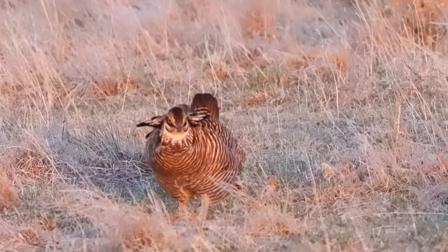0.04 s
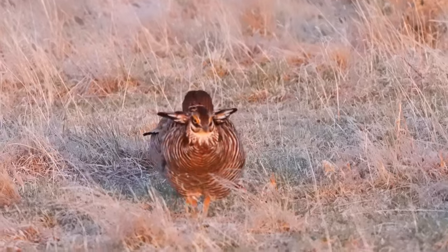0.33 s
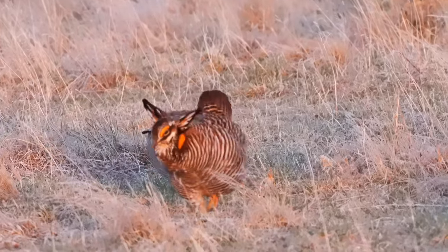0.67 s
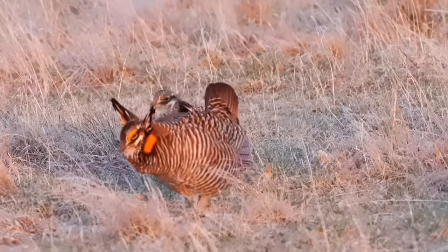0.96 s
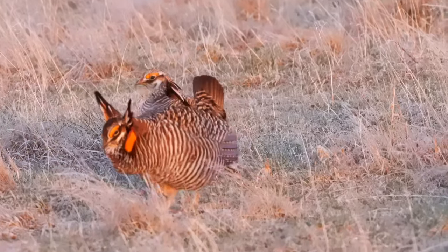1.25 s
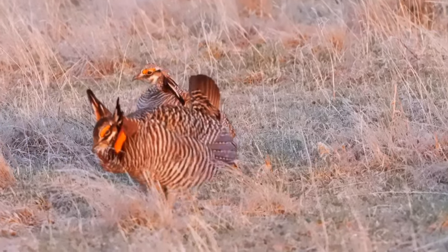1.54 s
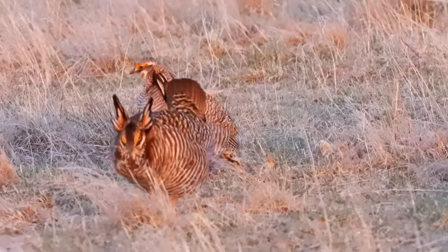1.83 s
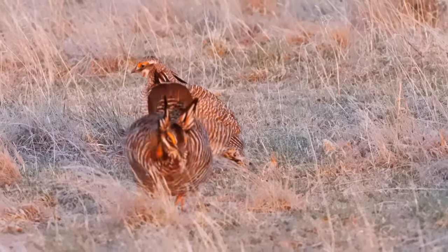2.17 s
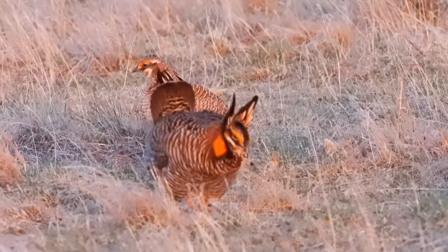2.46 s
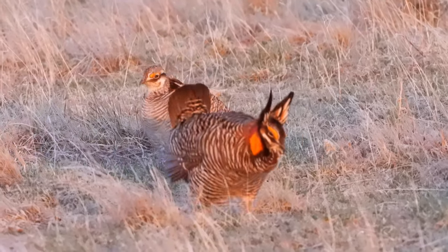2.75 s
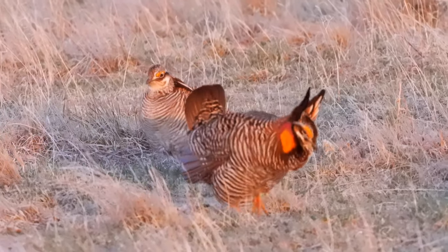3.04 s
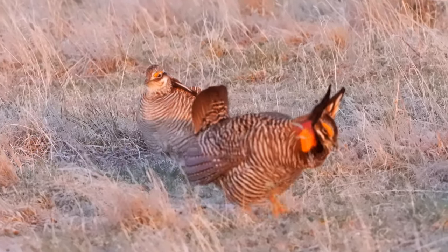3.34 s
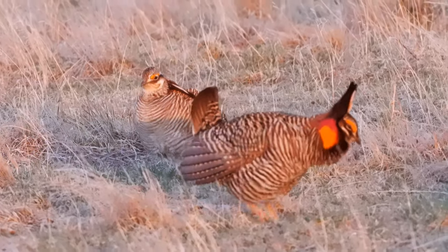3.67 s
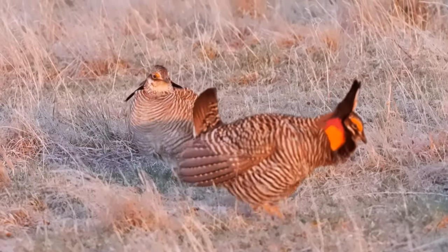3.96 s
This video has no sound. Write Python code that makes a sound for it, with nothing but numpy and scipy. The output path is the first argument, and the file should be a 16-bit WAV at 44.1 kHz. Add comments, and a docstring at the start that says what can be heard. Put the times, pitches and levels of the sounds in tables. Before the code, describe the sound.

Grouse call in open dry grassland: brief yelps, then two runs of rough cackles, and nasal whines at the end. Songbirds twitter and whistle throughout, mostly to the right, over light wind and a distant flock.

```python
"""Open grassland, where prairie grouse display with rough cackles, yelps, nasal whines and a faint boom.
A grouse call is a harmonic source, the syrinx, filtered by the throat; the far boom comes from air sacs.
Songbirds, mostly to the right, whistle, twitter and slur in gliding tones. Dry stems snap, and wind
hisses in the grass over the blur of the distant flock. The ground and the grass scatter the nearer
calls into a short tail."""
import sys
import numpy as np
from scipy import signal
from scipy.fft import rfft, irfft, next_fast_len
from scipy.io import wavfile
from scipy.ndimage import uniform_filter1d, map_coordinates

SR = 44100
rng = np.random.default_rng(int(sys.argv[2]) if len(sys.argv) > 2 else 0)


def bounce(signal):
    """Save signal as a 16-bit WAV file at the path given by the first command-line argument."""
    frames = np.transpose(np.atleast_2d(signal))
    limited = np.clip(frames, -1, 1)
    pcm = np.round(limited * 32767).astype(np.int16)
    wavfile.write(sys.argv[1], SR, pcm)


N = 176400

# Spectra of still air, flock and grass hiss. Each row: frequency in Hz, relative density in dB.
AIR_SPECTRUM = [(25, -25), (100, -13), (180, -5), (600, -1), (2000, 10), (4500, 11), (8000, 6.5),
                (15500, 0.5)]
FLOCK_SPECTRUM = [(25, -51), (100, -41.5), (230, -30), (370, -11), (700, -3.5), (1200, 1.5), (2000, 2),
                  (3000, -10.5), (6000, -50), (12000, -58)]
HISS_SPECTRUM = [(300, -24), (2000, -2), (4500, 0), (7000, -3.5), (9500, 1), (15500, -2.5)]
# Likeness of distant sound in the two channels. Each row: frequency in Hz, coherence from 0 to 1.
FAR_COHERENCE = [(60, 0.92), (250, 0.95), (600, 0.55), (1200, 0.48), (2500, 0)]
# Envelopes of the flock, the gusts and the booming. Each row: time in seconds, level in dB.
FLOCK_LEVEL = [(0, -54), (.5, -58), (.9, -44), (1.25, -48), (1.5, -41.5), (1.9, -44), (2.15, -46),
               (2.65, -49), (3.05, -42.5), (3.45, -49), (3.7, -52.5), (4, -46.5)]
GUST_LEVEL = [(.55, -59), (.88, -45), (.98, -49.5), (1.25, -44), (1.5, -43), (1.78, -48.5), (1.9, -45.5),
              (2.1, -47), (2.3, -54), (2.8, -57.5), (3.5, -58.5), (3.67, -49), (4, -47)]
BOOM_LEVEL = [(1.6, -85), (2.15, -73), (2.3, -63), (2.48, -76), (2.65, -69), (3.25, -64), (3.7, -80)]
# Balance of the hiss. Each row: frequency in Hz, pan in dB (every pan is left over right).
HISS_PAN = [(4000, 1), (8000, -2), (12000, 5)]
# Reverberation of the field. Each row: frequency in Hz, seconds to decay by 60 dB.
FIELD_DECAY = [(300, 0.95), (1500, 0.27), (3000, 0.39), (8000, 0.046)]
# Grouse yelps and whines. Each row: start and length in seconds, first, middle and last pitch in Hz,
# relative level in dB, roughness from 0 to 1, pan in dB.
YELPS = [(.04, 0.06, 556, 605, 660, -52.5, 0.5, 1), (.123, 0.052, 771, 804, 745, -46, 0.9, 6),
         (.568, 0.029, 720, 870, 1063, -45, 0.54, 5), (.588, 0.048, 1026, 1186, 1322, -27.5, 0.56, 4.5),
         (.825, 0.05, 1444, 1383, 1316, -30.5, 0.48, 6)]
WHINES = [(3.758, 0.115, 640, 436.5, 361, -40, 0.9, -2), (3.908, 0.1, 510, 506, 480, -35, 0.25, -4)]
# Grouse cackle notes. Each row: start and length in seconds, first and last pitch in Hz,
# relative level in dB, roughness from 0 to 1.
CACKLES = [(0.905, 0.03, 780, 850, -39, .3), (0.934, 0.03, 770, 590, -34.5, 0.4),
           (1.02, 0.027, 805, 799, -39, 0.15), (1.045, 0.019, 950, 985, -30.5, .08),
           (1.063, 0.03, 680, 550, -37.5, 0.35), (1.338, 0.02, 985, 925, -39.5, 0.25),
           (1.356, 0.024, 780, 600, -35, 0.2), (1.414, 0.032, 930, 925, -36, 0.22),
           (1.443, 0.022, 740, 610, -34.5, 0.35), (1.492, 0.014, 910, 900, -37, 0.2),
           (1.514, 0.019, 880, 990, -35, 0.25), (1.537, .03, 890, 845, -33, 0.25),
           (1.569, 0.034, 960, 895, -31.5, 0.2), (1.603, 0.02, 900, 735, -37, 0.2),
           (1.629, 0.034, 780, 610, -42, 0.3), (3.045, 0.028, 797, 894, -35, 0.8),
           (3.128, 0.026, 796, 780, -41, 0.3), (3.168, 0.036, 780, 932, -37, 0.6),
           (3.291, 0.019, 694, 600, -39.5, 0.7), (3.355, 0.015, 725, 600, -40, .8),
           (3.409, 0.0174, 723, 576, -41.5, .7)]
# Throat responses of the three grouse calls. Each row: frequency in Hz, relative gain in dB.
YELP_THROAT = [(600, 13), (1300, -10), (1700, -25), (6000, -46)]
CACKLE_THROAT = [(400, -56.5), (900, -15), (1350, 4), (1900, 2), (2300, -3.5), (2900, -33), (4000, -26.5),
                 (7000, -30)]
WHINE_THROAT = [(350, -16), (520, -14), (1000, 5.5), (1550, 0), (2050, -11.5), (3000, -31), (4000, -14.5),
                (5000, -48)]
# Songbird whistles. Each row: start and length in seconds, first and last pitch in Hz,
# level in dB, swell over the note in dB, pan in dB.
WHISTLES = [(0.046, 0.066, 2060, 1907, -39, 25, -4.5), (0.152, 0.051, 1988, 1887, -31, 10.5, -5.5),
            (0.389, 0.068, 2308, 2234, -35, 5, -5), (0.447, 0.075, 2090, 1730, -48, -19, -3),
            (0.469, 0.059, 2240, 2134, -45.5, -11, 1), (0.503, 0.16, 1770, 1616, -39.5, -6.5, -6),
            (0.728, 0.0976, 3130, 3020, -34, 4, -4), (0.841, 0.046, 1995, 1945, -26, 12, -7.5),
            (0.951, 0.027, 2480, 2470, -35, 11, -7), (1.141, 0.07, 2454, 2363, -26.5, -2.5, -7),
            (1.212, 0.026, 1740, 1686, -36.5, 2, -9), (1.555, 0.058, 4680, 4860, -40, -3, 2),
            (1.718, 0.052, 2930, 2975, -29, -1, -1.5), (1.969, 0.085, 3500, 3500, -31.5, 8, -2.5),
            (2.121, 0.069, 2637, 2638, -31, 2, 1), (2.224, 0.085, 2575, 2655, -28, 10.5, -0.5),
            (2.38, .1, 3636, 3575, -33.5, -6, -3), (2.595, 0.065, 4226, 4165, -29.5, 8.5, -4),
            (2.821, 0.024, 2133, 2100, -23.5, 2, -3), (2.905, 0.13, 1514, 1457, -27, -5.5, -9),
            (3.889, 0.059, 2600, 2504, -24, -3, -4)]
# Twitter syllables. Each row: time in seconds, level in dB.
SYLLABLES = [(0.088, -37.5), (0.145, -38.5), (0.198, -39.5), (0.246, -39), (0.306, -38.5), (0.362, -39),
             (0.425, -39), (0.488, -40.5), (.56, -38.5)]
# Chips of one syllable. Each row: offset and length in seconds, first and last pitch in Hz, gain in dB.
CHIPS = [(-.019, .012, 3200, 2950, -4), (-.006, .009, 3600, 4300, -.5), (.002, .009, 4250, 4350, 0),
         (.01, .012, 4750, 4050, -4)]
# Songbird slurs. Each row: start and length in seconds, first, middle and last pitch in Hz,
# level in dB, jitter as a fraction of pitch.
SLURS = [(0.979, 0.039, 3530, 3230, 2330, -29, .035), (2.508, 0.038, 1780, 2090, 2110, -27.5, .04),
         (2.544, 0.022, 2200, 1900, 2150, -26, .1), (2.563, .022, 2480, 3300, 4200, -39.5, .07),
         (2.697, 0.021, 5800, 5150, 4450, -39, .03), (2.722, .043, 4094, 2900, 2200, -29.5, .04),
         (2.762, 0.036, 2333, 2050, 2350, -29, .1), (2.788, 0.026, 2600, 3500, 3570, -36, .05)]
# Phase difference of the birdsong. Each row: frequency in Hz, lead of the left channel in radians.
SONG_PHASE = [(1500, -0.7), (1950, -2.15), (2150, -1.5), (2560, -3), (2700, -3), (3550, -2.5), (4200, -4.5)]
# Snaps of dry stems. Each row: start in seconds, peak level in dB, band centre in Hz.
SNAPS = [(.613, -30, 4800), (1.114, -27, 1400), (3.5875, -31, 1500)]

GROUSE_GAIN_DB = -3  # common to yelps, cackles and whines


def amp(db):
    """Amplitude ratio of a level in decibels."""
    return 10 ** (np.asarray(db) / 20)


def unit(x):
    """Normalisation to an rms of 1."""
    return x / np.sqrt(np.mean(x ** 2) + 1e-20)


def along(points, hz):
    """Interpolation of (Hz, value) points on a logarithmic frequency axis."""
    knot_hz, values = np.transpose(points)
    return np.interp(np.log(hz + 1), np.log(knot_hz + 1), values)


def envelope(points):
    """Linear interpolation of (seconds, value) points at every sample."""
    return np.interp(np.arange(N) / SR, *np.transpose(points))


def wobble(rate, size=N):
    """Smooth random modulation: a spline through rate random knots a second."""
    return map_coordinates(rng.standard_normal(4096), [np.arange(size) * rate / SR], mode="wrap")


def filtered(x, response):
    """Filtering as multiplication of the spectrum by a frequency response."""
    size = next_fast_len(N + SR // 2)
    return irfft(rfft(x, size) * response(np.fft.rfftfreq(size, 1 / SR)), size)[..., :N]


def panned(x, pan_db):
    """A level difference between left and right at constant total power."""
    gains = np.array([amp(pan_db / 2), amp(-pan_db / 2)]).reshape(2, -1)
    return x * gains / np.sqrt(np.mean(gains ** 2, axis=0))


def add(out, start, x):
    """Superposition of x on out from start seconds."""
    i = max(0, round(start * SR))
    out[:, i:i + x.shape[-1]] += x[..., :max(0, N - i)]


def glide(length, pitches, edge_s):
    """Time, a polynomial pitch curve through evenly spaced points, and a soft-edged gate."""
    t = np.arange(int(length * SR)) / SR
    contour = np.polyfit(np.linspace(0, 1, len(pitches)), pitches, len(pitches) - 1)
    gate = np.sin(np.pi / 2 * np.clip(np.minimum(t, length - t) / edge_s, 0, 1))
    return t, np.polyval(contour, t / length), gate


def phase_of(hz):
    """Phase as the time integral of frequency."""
    return 2 * np.pi * np.cumsum(hz) / SR


def scattered(x, near_db, far_db, near_decay_s=.018):
    """Convolution with the direct path, scatter from nearby grass and the longer tail of the field."""
    hz, t, spectra = signal.stft(rng.standard_normal((2, SR // 2)), SR, nperseg=256)
    far = signal.istft(spectra * amp(-60 * t / along(FIELD_DECAY, hz)[:, None]), SR, nperseg=256)[1]
    near = rng.standard_normal(far.shape) * np.exp(-np.arange(far.shape[1]) / SR / near_decay_s)
    response = amp(near_db) * near / np.linalg.norm(near[0]) + amp(far_db) * far / np.linalg.norm(far[0])
    response[:, 0] += 1  # direct path
    return signal.fftconvolve(x, response, axes=1)


def rush(spectrum, coherence, patchy_db):
    """Partly coherent stereo noise of rms 1, its gain varying in patches of time and frequency."""
    spectra = signal.stft(rng.standard_normal((2, N)), nperseg=1024)[2]
    patches = rng.standard_normal(spectra.shape[1:])
    patches = uniform_filter1d(uniform_filter1d(patches, size=5, axis=0), size=5, axis=1)
    pair = signal.istft(spectra * amp(patchy_db * unit(patches)), nperseg=1024)[1][:, :N]

    def mid_side_gains(hz):
        angle = np.arccos(np.clip(along(coherence, hz), -1, 1)) / 2
        return amp(along(spectrum, hz)) * [np.cos(angle), np.sin(angle)]

    mid, side = filtered(pair, mid_side_gains)
    return unit(np.array([mid + side, mid - side]))


def still_air():
    """The ambient noise floor: steady, broadband and most coherent at low frequencies."""
    return amp(-53) * rush(AIR_SPECTRUM, FAR_COHERENCE, patchy_db=4.0)


def distant_flock():
    """Many far voices sum incoherently to a band of noise that swells and fades."""
    level_db = envelope(FLOCK_LEVEL) + .45 * wobble(25.04)
    return panned(amp(level_db) * rush(FLOCK_SPECTRUM, FAR_COHERENCE, patchy_db=1.7), pan_db=3)


def wind_in_grass():
    """Airflow through dry grass radiates an incoherent hiss whose level follows the gusts."""
    level_db = envelope(GUST_LEVEL) + .42 * wobble(31.07)
    hiss = amp(level_db) * rush(HISS_SPECTRUM, coherence=[(4000, .017)], patchy_db=1.3)
    return filtered(hiss, lambda hz: panned(1.0, along(HISS_PAN, hz)))


def grouse_voice(length, pitches, rough, throat, edge_s, jitter=.05, rasp_db=5.5):
    """Source and filter: the throat weights twelve harmonics of a syrinx unsteady in pitch and level."""
    t, hz, gate = glide(length, pitches, edge_s)
    phase = phase_of(hz * (1 + jitter * rough * wobble(507, len(t))))
    tone = sum(amp(along(throat, k * hz)) * np.sin(k * phase) for k in range(1, 13))
    rasp = amp(rasp_db * rough * wobble(434, len(t)))
    return amp(GROUSE_GAIN_DB) * gate * unit(tone * rasp)


def soft_calls(calls, throat, edge_s):
    """Grouse glides with a gradual onset and release, scattered by the field."""
    out = np.zeros((2, N))
    for start, length, *pitches, db, rough, pan_db in calls:
        note = amp(db) * grouse_voice(length, pitches, rough, throat, edge_s)
        add(out, start, scattered(panned(note, pan_db), near_db=-6, far_db=-9.5))
    return out


def yelps():
    """Short grouse calls in which a low-pass throat leaves the fundamental dominant."""
    return soft_calls(YELPS, YELP_THROAT, edge_s=.02)


def whistles(scoop_s=.012, waver=.0035, flutter_db=2.2):
    """Nearly pure songbird tones, lightly modulated in frequency and amplitude."""
    out = np.zeros((2, N))
    for start, length, first_hz, last_hz, db, swell_db, pan_db in WHISTLES:
        t, hz, gate = glide(length, [first_hz, last_hz], edge_s=.009)
        scoop = .012 * (first_hz / 2000) ** 3  # each note drops onto its pitch, high notes farther
        hz = hz * (1 + scoop * np.exp(-t / scoop_s) + waver * wobble(122.6, len(t)))
        level_db = db + swell_db * (t / length - .5) + flutter_db * wobble(91, len(t))
        note = gate * amp(level_db) * np.sin(phase_of(hz))
        add(out, start, scattered(panned(note, pan_db), near_db=-12, far_db=-13.5))
    return out


def twitter(jitter=.026, spread_db=2):
    """Temporal fusion: four brief chips, varied in pitch and level, are heard as one syllable."""
    out = np.zeros((2, N))
    for start, db in SYLLABLES:
        for offset, length, first_hz, last_hz, chip_db in CHIPS:
            t, hz, gate = glide(length, [first_hz, last_hz], edge_s=.0032)
            hz = hz * (1 + jitter * (rng.standard_normal() + wobble(695, len(t))))
            note = gate * amp(db + chip_db + spread_db * rng.standard_normal()) * np.sin(phase_of(hz))
            add(out, start + offset, scattered(panned(note, pan_db=-2), near_db=-2, far_db=-16))
    return out


def snapping_stems(decay_s=.0005, width_octaves=.8):
    """A breaking stem gives an impulse, and so short a pulse occupies a broad band."""
    out, t = np.zeros((2, N)), np.arange(SR // 50) / SR
    for start, peak_db, centre_hz in SNAPS:
        pulse = np.zeros((1, N))
        add(pulse, start, np.exp(-t / decay_s) * (1 + .5 * rng.standard_normal(len(t))))
        band = lambda hz: hz * np.exp(-.5 * (np.log2((hz + 1) / centre_hz) / width_octaves) ** 2)
        snap = filtered(pulse, band)
        out += amp(peak_db) * snap / np.abs(snap).max()
    return out


def cackles():
    """Abrupt, rough grouse notes; a throat resonance lifts the overtones above the fundamental."""
    out = np.zeros((2, N))
    for start, length, *pitches, db, rough in CACKLES:
        note = amp(db) * grouse_voice(length, pitches, rough, CACKLE_THROAT, edge_s=.0015)
        add(out, start, scattered(panned(note, pan_db=3), near_db=-14.5, far_db=-6))
    return out


def slurs():
    """Fast songbird sweeps, roughened by the sidebands of random frequency modulation."""
    out = np.zeros((2, N))
    for start, length, *pitches, db, jitter in SLURS:
        t, hz, gate = glide(length, pitches, edge_s=.00095)
        hz = hz * (1 + jitter * wobble(606, len(t)))
        note = gate * amp(db) * np.sin(phase_of(hz))
        add(out, start, scattered(panned(note, pan_db=-3.5), near_db=-5.5, far_db=-10.5))
    return out


def boom(pitch_hz=286, spread_hz=16):
    """Beating: the air sacs of several far males sum to one low tone of wandering level and phase."""
    beats = unit(wobble(spread_hz)) + 1j * unit(wobble(spread_hz))
    carrier = np.exp(2j * np.pi * pitch_hz * np.arange(N) / SR)
    return amp(envelope(BOOM_LEVEL)) * np.real(beats * carrier) / np.sqrt(2)


def whines():
    """Falling grouse calls, made nasal by a formant near 1 kHz over a weak fundamental."""
    return soft_calls(WHINES, WHINE_THROAT, edge_s=.025)


def from_the_right(song):
    """Path difference: the song reaches the right microphone first, so the left lags in phase."""
    return filtered(song, lambda hz: np.exp(1j * np.outer([.5, -.5], along(SONG_PHASE, hz))))


def scene():
    """Superposition of all the birds and the windy field."""
    songbirds = from_the_right(whistles() + slurs() + twitter())
    grouse = cackles() + yelps() + whines()
    return songbirds + grouse + boom() + snapping_stems() + distant_flock() + wind_in_grass() + still_air()


def record(dry, start_s=.035, top_hz=15900):
    """A gate opens after a moment, and an ideal low-pass filter limits the band."""
    return filtered(dry * (np.arange(N) / SR > start_s), lambda hz: hz < top_hz)


dry = scene()
out = record(dry)
bounce(out)
```